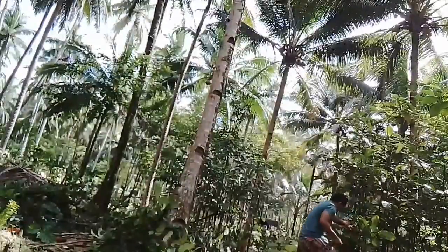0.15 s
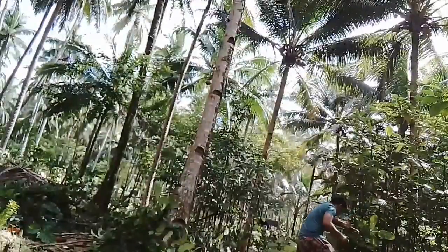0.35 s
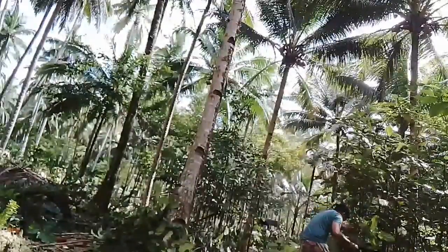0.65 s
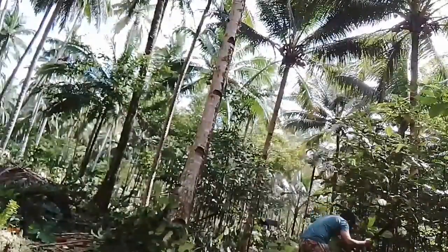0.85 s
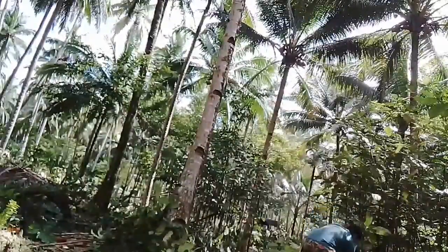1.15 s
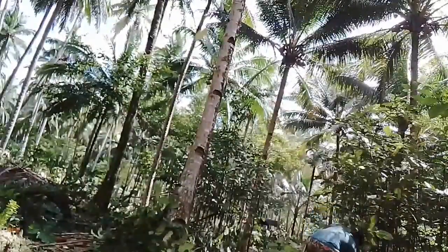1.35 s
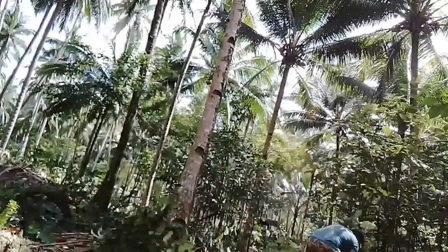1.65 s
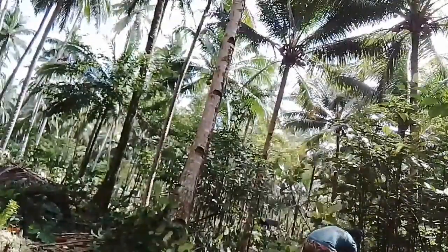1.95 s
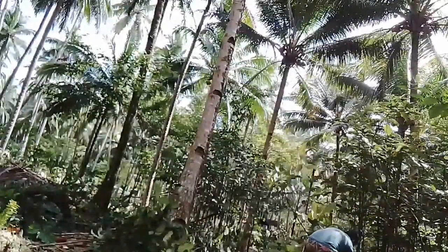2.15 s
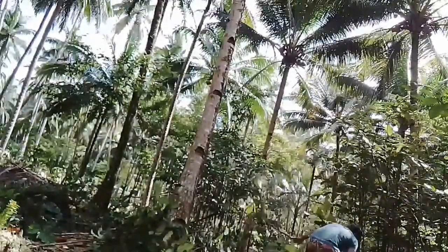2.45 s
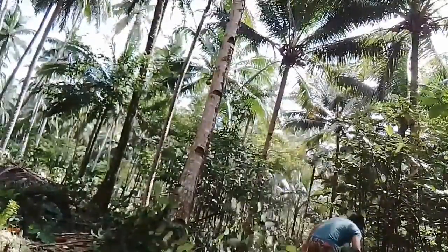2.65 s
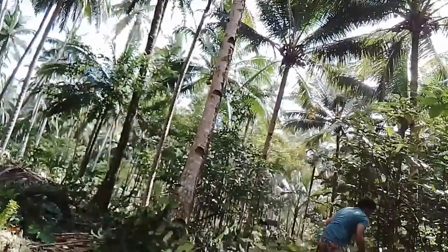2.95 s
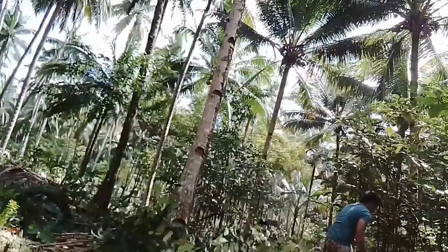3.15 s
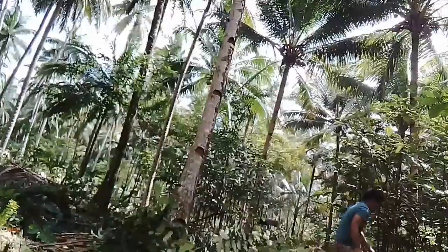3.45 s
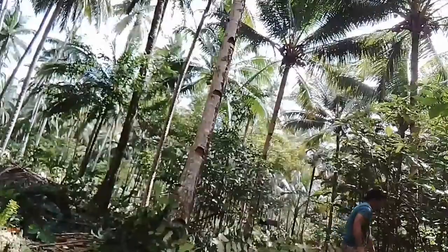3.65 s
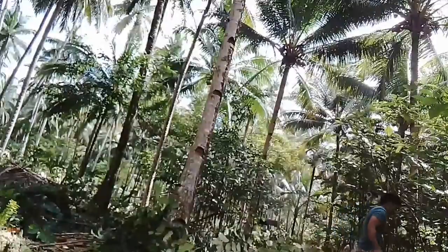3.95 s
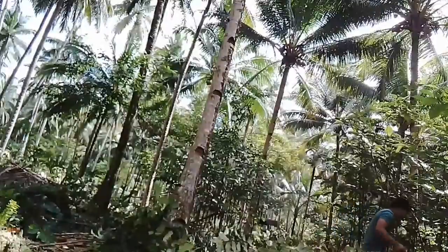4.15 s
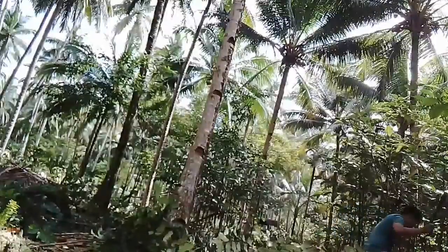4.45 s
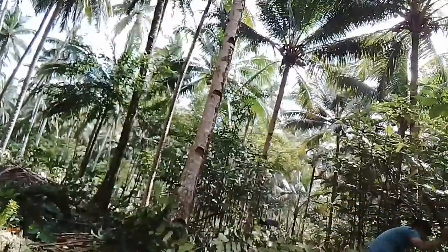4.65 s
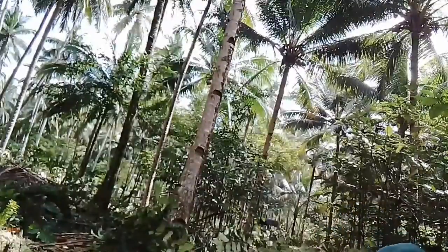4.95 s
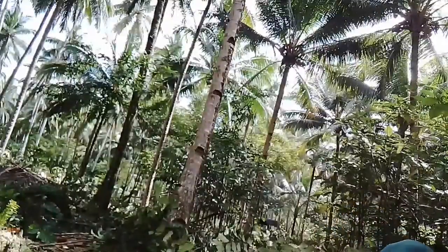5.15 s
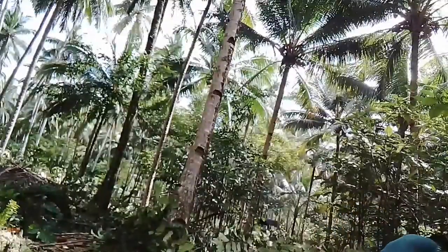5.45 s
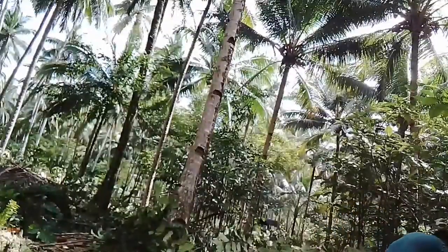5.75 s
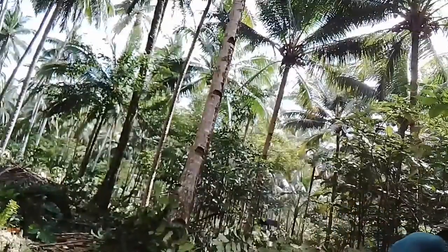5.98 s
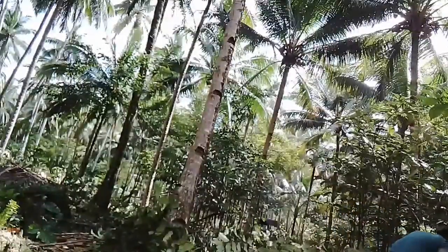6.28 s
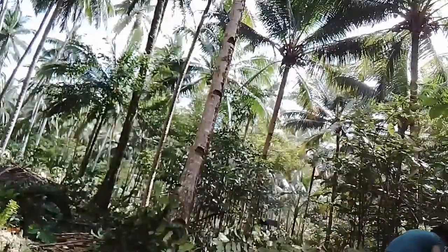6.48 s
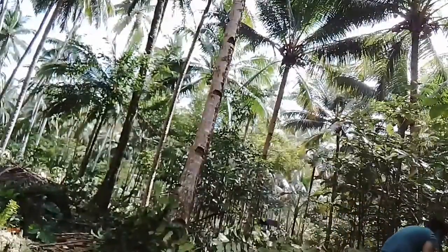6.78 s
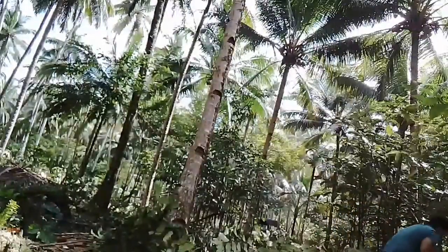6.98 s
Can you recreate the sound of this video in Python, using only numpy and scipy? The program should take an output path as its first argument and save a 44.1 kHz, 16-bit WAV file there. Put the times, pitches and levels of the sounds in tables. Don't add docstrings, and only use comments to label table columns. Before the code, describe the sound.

Some metres from a small microphone in a palm grove, brush rustles and ticks quietly. A machete cracks through stems, then strikes again about a second later with a heavier hollow knock. Leaves sway, twigs snap and cut pieces bump through a busy rustle. After a calmer spell a third sharp chop lands, followed by light leaf stirring. Trunks scatter each hit; distant fronds and thin insects continue underneath.

```python
import sys
import numpy as np
from scipy import signal
from scipy.io import wavfile
from scipy.ndimage import uniform_filter1d

SR = 44100
rng = np.random.default_rng(int(sys.argv[2]) if len(sys.argv) > 2 else 0)


def bounce(signal):
    frames = np.transpose(np.atleast_2d(signal))
    limited = np.clip(frames, -1, 1)
    pcm = np.round(limited * 32767).astype(np.int16)
    wavfile.write(sys.argv[1], SR, pcm)


def ratio(d):
    e = np.asarray(d, float) / 20
    return 10 ** e


N = 313815


def evened(x):
    return x / np.sqrt(np.mean(x ** 2) + 1e-20)


def read(points, hz):
    f, value = np.transpose(points)
    return np.interp(np.log(hz + 1), np.log(f + 1), value)


def add(mix, start_s, sound):
    part = mix[max(round(start_s * SR), 0):][:len(sound)]
    part += sound[:len(part)]


def resonate(x, hz, width_hz):
    turn = np.exp(2j * np.pi * hz * np.arange(len(x)) / SR)
    r = np.exp(-np.pi * width_hz / SR)
    smooth = signal.lfilter([(1 - r) ** 2], [1, -2 * r, r * r], x / turn)
    return 2 * (turn * smooth).real


def shaped(x, points, patchy_db):
    hz, _, z = signal.stft(x, SR, nperseg=1024, noverlap=768)
    patches = uniform_filter1d(rng.standard_normal(z.shape), 10, 0)
    patches = evened(uniform_filter1d(patches, 12, 1))
    gain_db = read(points, hz)[:, None] + patchy_db * patches
    return evened(signal.istft(z * ratio(gain_db), SR, nperseg=1024, noverlap=768)[1][:N])


def leafy(x):
    # freq_hz, level_db
    leaf_spectrum = [(1500, -51), (3000, -3), (4200, -9.5), (5000, -7), (5700, -2.5), (6600, 1), (7500, 3),
                     (8300, -1), (9500, -8), (11500, -18.5), (15500, -32)]
    log_gain = np.log(ratio(read(leaf_spectrum, abs(np.fft.fftfreq(2048, 1 / SR)))))
    taps = np.fft.ifft(np.exp(np.conj(signal.hilbert(log_gain)))).real[:512]
    return signal.oaconvolve(x, taps)[:len(x)]


def grains(per_s, spread_db, bed):
    sizes = ratio(spread_db * np.minimum(rng.exponential(1, N), 4))
    clicks = sizes * (rng.random(N) < per_s / SR)
    bursts = signal.lfilter([1], [1, -.96], clicks)
    return rng.standard_normal(N) * (evened(bursts) + bed)


def cracks(rows, rise_s, clean):
    out, t = np.zeros(N), np.arange(5000) / SR
    for start_s, leaf_db, stem_db, stem_hz, t60_s in rows:
        fall = ratio(-60 * t / max(t60_s, .004)) + .5 * ratio(-60 * t / 0.013)
        fall = fall * (1 - np.exp(-t / rise_s))
        leaf = leafy(rng.standard_normal(5000) * fall)
        fibres = rng.standard_normal(5000)
        torn = evened(resonate(fibres, stem_hz, 1040) + 0.4 * resonate(fibres, 1800, 1860))
        snap = clean * np.sin(2 * np.pi * stem_hz * t) * ratio(-60 * t / 0.011)
        stem = (torn + snap) * fall
        both = leaf / abs(leaf).max() + ratio(stem_db) * stem / abs(stem).max()
        add(out, start_s, ratio(leaf_db) * both)
    return out


def knocks(rows, late):
    out = np.zeros(N)
    for crest_s, peak_db, hz, rise_s in rows:
        rise_s = max(rise_s, .0004)
        u = np.arange(0, 8 * rise_s, 1 / SR) / rise_s
        push = (u * np.exp(1 - u)) ** 3
        ring = np.cos(2 * np.pi * hz * rise_s * (u - 1))
        add(out, crest_s - (1 - late) * rise_s, ratio(peak_db) * push * ring)
    return signal.sosfilt(signal.butter(3, 80, "highpass", fs=SR, output="sos"), out)


def far_fronds():
    # freq_hz, level_db
    wash_spectrum = [(20, -30), (50, -7), (100, -5.5), (140, 0.5), (200, -9.5), (400, -7), (800, -8),
                     (1300, -6), (2000, -20.5), (3500, -16), (6000, -19), (9000, -25), (13000, -28.5),
                     (15500, -28.5)]
    return ratio(-59.5) * shaped(rng.standard_normal(N), wash_spectrum, patchy_db=1.44)


def insects():
    # start_s, end_s, level_db
    bouts = [
        (-.2, .62, -70),
        (1.0, 2.4, -71),
        (3.9, 4.95, -71),
        (5.4, 6.15, -70.5),
        (6.5, 7.3, -68.5),
    ]
    fade_s, between_db = .08, -74.5
    t = np.arange(N) / SR
    song = np.zeros(N)
    for start_s, end_s, level_db in bouts:
        song += ratio(level_db) * (np.tanh((t - start_s) / fade_s) - np.tanh((t - end_s) / fade_s)) / 2
    chorus = evened(resonate(rng.standard_normal(N), 4940, 700))
    return np.maximum(song, ratio(between_db)) * chorus


def wind_gusts():
    # centre_s, level_db, half_width_s
    gusts = [
        (6.1, -63, 0.18),
        (6.87, -62, 0.31),
    ]
    t = np.arange(N) / SR
    breath = sum(ratio(db) * np.exp(-((t - s) / half_s) ** 2) for s, db, half_s in gusts)
    return breath * evened(leafy(grains(1200, 2.5, 3)))


def rustle():
    # time_s, level_db
    stir = [(0.0, -67), (0.46, -71.5), (0.83, -64.5), (1.2, -71.5), (1.6, -64), (1.88, -61.5), (2.3, -68),
            (2.82, -60.5), (2.99, -52.5), (3.14, -58.5), (3.41, -62.5), (3.73, -62), (4.6, -71.5),
            (5.85, -72), (6.15, -64.5), (6.45, -68), (6.7, -69), (7.12, -71)]
    # start_s, level_db, t60_s
    sways = [
        (1.61, -50, 0.49),
        (2.51, -46.5, 0.71),
        (5.28, -52, 0.63),
    ]
    # rest_db, push_db, sway_db
    layer_levels = [
        (-86, -1, 0.5),
        (-66, 0, 2),
        (-61, 3.5, -2.5),
    ]
    # freq_hz, level_db
    stem_spectrum = [(400, -31), (900, -1.5), (1400, -5.5), (1900, -0.5), (2700, -4), (3600, -10.5),
                     (4800, -8), (7000, -31)]
    # freq_hz, level_db
    litter_spectrum = [(60, -28), (120, -11.5), (200, 4.5), (350, 0.5), (600, -1), (900, -9), (1500, -19),
                       (3000, -50)]
    sway_rise_s = 0.0041

    t = np.arange(N) / SR
    push = ratio(np.interp(t, *np.transpose(stir)))
    sway = np.zeros(N)
    for start_s, level_db, t60_s in sways:
        since_s = np.maximum(t - start_s, 0)
        sway += ratio(level_db - 60 * since_s / t60_s) * (1 - np.exp(-since_s / sway_rise_s))

    jostle = grains(800, 3.2, 3.0)
    leaves = evened(leafy(grains(1200, 4.1, 2.5)))
    stems = shaped(jostle, stem_spectrum, patchy_db=2.0)
    litter = shaped(jostle, litter_spectrum, patchy_db=1.5)
    out = np.zeros(N)
    for (rest_db, push_db, sway_db), layer in zip(layer_levels, (leaves, stems, litter)):
        power = ratio(rest_db) ** 2 + (ratio(push_db) * push) ** 2 + (ratio(sway_db) * sway) ** 2
        out += np.sqrt(power) * layer
    return out


def leaf_swishes():
    # start_s, leaf_db, stem_rel_db, stem_hz, t60_s
    swishes = [(0, -45, -3, 2600, 0.079), (.755, -56, 0, 3000, 0.12), (1.80, -46, 2.5, 1290, 0.25),
               (1.865, -45, 1.5, 1390, 0.14), (2.89, -54, 9, 2100, .15), (2.935, -50, 1, 2200, 0.22),
               (3.046, -42, 6, 1900, 0.039), (3.065, -45, -2, 1300, 0.15), (6.025, -46.5, -5, 1700, 0.12),
               (6.16, -50, 0, 2060, 0.15), (6.255, -51, -10, 1600, 0.088)]
    return cracks(swishes, rise_s=0.0091, clean=0)


def twigs_and_ticks():
    # start_s, leaf_db, stem_rel_db, stem_hz
    twigs = [(0.0097, -55, 3, 2500), (0.0363, -40.5, -5, 2480), (0.414, -45.5, -5.5, 2850),
             (0.63, -58, 3, 2900), (0.756, -48, -10, 3160), (0.8034, -41, 1, 2710), (0.835, -51, -1, 2300),
             (1.411, -36, 0, 2520), (1.528, -48, -1, 2420), (1.796, -39, -1, 2200), (1.824, -43, -1, 1400),
             (1.863, -36, -6, 2650), (2.096, -49, 2, 2030), (2.226, -50, 4, 1510), (2.408, -47, 5.5, 2720),
             (2.771, -50, 9.5, 2150), (2.815, -45.5, 6, 2450), (2.8648, -39.5, 2, 2400),
             (2.94, -39.5, -3, 2230), (3.0135, -45, -3, 1800), (3.0555, -32.5, 1.5, 2220),
             (3.08, -48, 3, 2790), (3.4699, -52.5, 10.5, 1380), (3.6718, -57.5, 21.5, 2350),
             (3.7492, -48, 5, 1940), (5.1392, -48.5, -1, 1400), (5.1662, -47.5, -6, 1640),
             (5.952, -62, 13, 1440), (6.1652, -49, 6.5, 1620), (6.1944, -56, 4, 2120)]
    # start_s, leaf_db
    ticks = [(0.2079, -46), (0.609, -46), (0.7675, -47), (0.897, -47), (1.648, -48), (1.878, -43),
             (1.893, -45), (1.979, -50), (2.7025, -38), (2.895, -51), (2.9174, -42), (2.978, -43),
             (3.1353, -42), (3.2884, -47), (3.327, -45.5), (3.9035, -56), (4.935, -53), (5.8953, -51),
             (6.049, -45), (6.2622, -52), (6.2994, -53), (6.3425, -52), (6.3994, -54), (6.7294, -50),
             (6.82, -47), (6.929, -47.5)]
    twig_t60_s = 0.025
    stalk_rel_db, stalk_hz, tick_t60_s = -8, 1700, 0.026
    rows = [(*row, twig_t60_s) for row in twigs]
    rows += [(*row, stalk_rel_db, stalk_hz, tick_t60_s) for row in ticks]
    return cracks(rows, rise_s=0.0007, clean=2.2)


def small_knocks():
    # time_s, peak_db, pitch_hz
    bumps = [(0.628, -49, 334), (0.788, -47.5, 468), (0.834, -45, 423), (1.4315, -54, 430),
             (1.796, -45, 1310), (1.819, -43, 287), (1.844, -45, 795), (1.877, -45, 1300),
             (2.003, -47, 437), (2.704, -44, 550), (2.773, -40.5, 470), (2.862, -42, 247), (2.94, -37, 510),
             (2.978, -48, 581), (3.054, -33.5, 580), (3.081, -36, 477), (3.11, -45, 230), (3.344, -44, 358),
             (3.469, -50, 860), (3.747, -44, 328), (4.013, -39, 300), (4.857, -42, 405),
             (5.166, -41.5, 620), (5.949, -51, 870), (6.19, -50, 207), (6.299, -54, 1240),
             (6.402, -47.5, 595)]
    rise_s = 0.0029
    return knocks([(*row, rise_s) for row in bumps], late=0.59)


def clean_snaps():
    # crest_s, peak_db,
    # pitch_hz, rise_s
    snap_rows = [(.631, -58, 3000, 0.0013), (.804, -38, 2900, 0.00073), (.838, -49, 2480, .001),
                 (1.412, -33.5, 2760, 0.00047), (1.5576, -14.5, 2940, 0.00061),
                 (1.5575, -29, 4940, 0.0015), (1.58, -44, 2650, 0.00086), (2.4605, -25, 4960, 0.0014),
                 (2.4608, -21, 6700, 0.0011), (2.4715, -35, 2620, 0.00093), (2.905, -41, 2000, .001),
                 (2.925, -50, 1700, .001), (2.955, -31.5, 398, 0.00078), (2.968, -37, 1000, 0.0012),
                 (2.985, -43, 2500, .001), (3.005, -49, 900, .0015), (3.017, -47, 1800, .001),
                 (3.051, -37, 2320, 0.00053), (5.2385, -32, 13800, .0004), (5.2405, -24, 7060, 0.00092),
                 (5.895, -45, 6500, .0006), (5.955, -45, 1200, 0.00075), (6.165, -53, 2100, .001),
                 (5.239, -20.5, 3230, 0.00089), (5.2408, -18.5, 3200, 0.00058),
                 (5.2383, -30, 2680, 0.0026), (5.894, -46, 1500, 0.00079), (6.197, -51, 2100, .0015),
                 (6.296, -41, 1300, 0.00059), (6.406, -43, 1500, 0.00044),
                 (1.5557, -29, 1500, 0.00037), (1.558, -27, 8000, .0007), (1.5613, -28, 7600, 0.00086),
                 (1.5705, -39, 7400, .0015), (1.5763, -21, 7040, 0.00092), (1.58, -19.5, 7200, .0008),
                 (1.5785, -31, 2800, .0009), (1.5815, -28, 620, 0.0012), (1.5865, -30, 4570, .0015),
                 (1.5895, -34, 2800, .001), (1.578, -29, 8200, .0008), (2.4605, -37, 2300, 0.0008),
                 (2.469, -30, 8500, .001), (2.475, -29, 7800, .001), (5.2415, -20, 1980, 0.00065),
                 (5.2435, -33, 2600, 0.00062), (5.2425, -29, 6300, 0.0011), (1.591, -32, 7200, .001),
                 (1.595, -37, 6500, .001), (1.603, -40, 7500, .0015), (2.465, -30, 7600, .0008),
                 (2.4675, -28, 6800, .0007), (2.471, -19.5, 343, 0.0025), (2.472, -32, 7600, .001),
                 (2.4744, -28, 2500, .0005), (2.4808, -22, 2100, .0005), (2.481, -26, 7500, .001),
                 (2.486, -34, 7500, .002), (2.491, -31, 2700, .0008), (2.499, -28, 1400, 0.00042),
                 (2.543, -37, 1080, .003), (5.2266, -40, 8500, .0004), (5.2266, -44, 3000, .0004),
                 (5.2331, -34, 7100, .0008), (5.2331, -34, 9200, .0006), (5.234, -37, 2800, 0.00089),
                 (5.2376, -30, 2600, 0.00067), (5.2382, -25, 7400, 0.00068), (5.248, -32, 5640, 0.0012),
                 (5.256, -34, 6500, .001), (5.264, -33, 1500, 0.00046),
                 (.0375, -43, 7000, .0005), (.627, -55, 3050, .002), (.758, -45, 7900, .0007),
                (.758, -51, 3100, .0008), (.7685, -42, 8200, .0005), (.7735, -48, 8000, .0005),
                (.78, -48, 7500, .001), (.8042, -48, 7400, .0007), (.8045, -44, 3200, .0006),
                (.84, -50, 2500, .0012), (1.794, -44, 5700, .001), (1.799, -39, 7000, .0007),
                (1.8625, -40, 8400, .0005), (1.863, -38, 2710, 0.00076), (1.878, -37, 6100, .0007),
                (1.887, -42, 6000, .0007), (1.894, -45, 5500, .0008), (2.7035, -44, 7200, .0006),
                (2.981, -46, 2990, .001), (2.995, -45, 1900, .0008), (3.057, -42, 9700, .0005),
                (5.894, -50, 3500, .0004), (1.412, -38, 9000, .0005), (1.4126, -35, 7200, .0007),
                (1.416, -39, 8100, .0008), (2.705, -38, 650, .001), (2.779, -40, 470, .002),
                (2.783, -45, 450, .002), (2.867, -36, 2500, .0007), (2.891, -50, 2200, .001),
                (2.926, -46, 2200, .0008), (2.945, -41, 2600, .001), (2.965, -50, 2400, .001),
                (3.051, -39, 1200, .0007), (3.0565, -28, 8000, .0007), (3.0565, -32, 3000, .0005),
                (3.062, -39, 900, .0015), (3.075, -45, 2500, .001), (3.085, -39, 700, .0015),
                (3.138, -41, 5200, .0007), (3.138, -46, 8500, .0006), (5.1415, -46, 1400, .0006),
                (6.056, -48, 8200, .0006), (6.195, -54, 2000, .0012), (6.266, -52, 10200, .0006),
                (6.343, -53, 7500, .0006), (6.4065, -43, 750, .0009)]
    return knocks(snap_rows, late=0)


def hollow_blows():
    # crest_s, peak_db, pitch_hz, rise_s
    blow_rows = [(1.4134, -27.5, 547, 0.0014), (1.5575, -27.5, 420, 0.0013), (1.567, -36.5, 296, 0.004),
                 (1.577, -22.5, 586, 0.00057), (1.5843, -22.5, 387, 0.0013), (1.6035, -34, 1160, 0.0019),
                 (1.5835, -25.5, 770, 0.0035), (1.598, -39, 404, 0.005), (1.598, -40, 146, 0.0055),
                 (2.4625, -29, 507, 0.0015), (2.467, -17.5, 705, 0.0011), (2.4714, -15, 786, 0.00036),
                 (2.4695, -35, 480, 0.0096), (2.4741, -8, 355, 0.0019), (2.4805, -17, 313, 0.0014),
                 (2.476, -23.5, 139, 0.011), (2.4895, -26, 325, 0.0046), (5.2346, -34, 443, 0.0013),
                 (5.24, -21.5, 1400, 0.0016), (5.242, -19, 430, 0.0013), (5.2465, -32.5, 278, 0.0032),
                 (5.275, -46.5, 130, 0.011), (5.249, -33.5, 800, 0.004), (5.262, -41.5, 182, 0.016)]
    return knocks(blow_rows, late=0)


def chop_cracks():
    # start_s, leaf_db, stem_rel_db, stem_hz, t60_s
    chop_rows = [(1.5559, -32, -12, 2840, 0.017), (1.5572, -23.5, -2, 2650, 0.022),
                 (1.561, -29, -4, 2560, 0.044), (1.569, -28, -4, 2680, 0.054),
                 (1.5752, -20.5, -5.5, 2490, 0.032), (1.5795, -26, -1, 2580, 0.03),
                 (1.589, -40, 5, 2480, 0.044), (1.602, -47, -11, 2500, .06), (2.4418, -40, 6, 2660, 0.045),
                 (2.447, -40, 0, 2600, 0.048), (2.4597, -18.5, -5.5, 2700, 0.05),
                 (2.464, -24, -3, 2580, 0.037), (2.4705, -22, 6, 2050, 0.025), (2.48, -26, -7, 2270, 0.15),
                 (5.2262, -41, -1, 2600, 0.053), (5.2324, -30, -5, 2800, 0.022),
                 (5.2374, -18.5, -2, 2570, 0.011), (5.2398, -24, 1, 1900, 0.0063),
                 (5.2447, -26, -2, 2570, 0.038), (5.2485, -42, -7, 2000, 0.044),
                 (5.2555, -32, -5, 2600, 0.064), (5.264, -33.5, -8, 1990, 0.09)]
    return cracks(chop_rows, rise_s=0.0011, clean=2.1)


def grove(x):
    # freq_hz, t60_s
    far_decay = [(100, 0.44), (400, 0.23), (1200, 0.28), (3000, 0.57), (7000, 0.56), (12000, 0.17)]
    # freq_hz, level_db
    return_spectrum = [(100, 1), (300, 5), (1000, 13.5), (1600, 10), (2500, 1), (4200, 14.5), (7000, 6),
                       (12000, 10.5)]
    taps = np.zeros(SR)
    at = np.arange(150, SR - 20, 20)
    taps[at + rng.integers(0, 20, len(at))] = rng.choice([-1., 1.], len(at))
    hz, t, z = signal.stft(taps, SR, nperseg=256)
    near = ratio(6.5) * ratio(-60 * t / 0.11)
    far_onset = 0.092 + 0.69 / (1 + np.exp(-(t - .065) / 0.0027))
    far = far_onset * ratio(-60 * t / read(far_decay, hz)[:, None])
    tone = ratio(read(return_spectrum, hz))[:, None]
    tail = signal.istft(z * (near + far) * tone, SR, nperseg=256)[1]
    return signal.fftconvolve(x, tail / np.linalg.norm(tail))[:N]


def scene():
    background = far_fronds() + insects() + wind_gusts() + rustle()
    small = leaf_swishes() + twigs_and_ticks() + small_knocks()
    snaps, blows, chops = clean_snaps(), hollow_blows(), chop_cracks()
    returns = ratio(-3.0) * grove(chops + 0.63 * blows + small + 0.098 * snaps)
    return (background + small + snaps + blows + chops + returns)[None]


def low_pass(x):
    return signal.sosfilt(signal.butter(12, 15710, fs=SR, output="sos"), x)


def record(dry):
    thinned = signal.sosfilt(signal.butter(1, 60, "highpass", fs=SR, output="sos"), dry)
    edge = signal.firwin(255, 15550, window=("kaiser", 8), fs=SR)
    heard = signal.oaconvolve(thinned, edge[None], "same")
    return low_pass(heard)


dry = scene()
out = record(dry)
bounce(out)
```